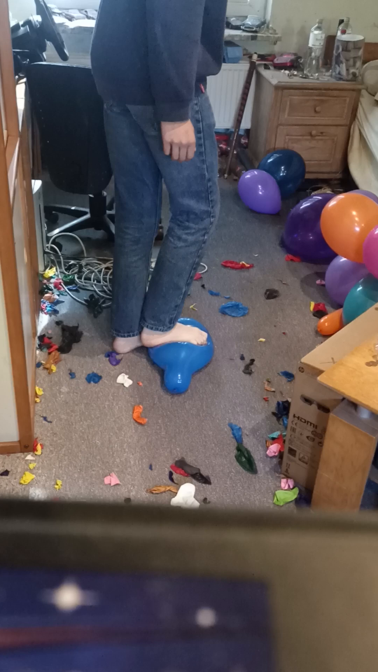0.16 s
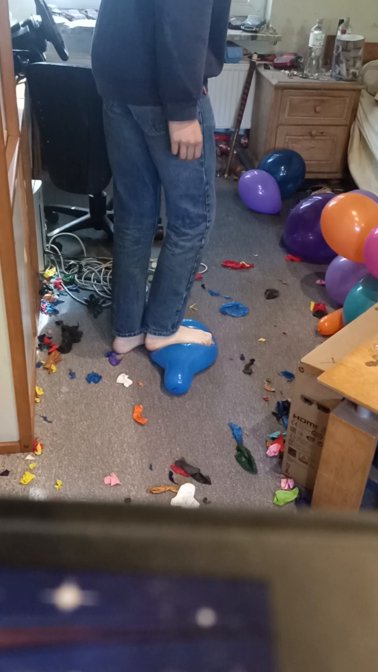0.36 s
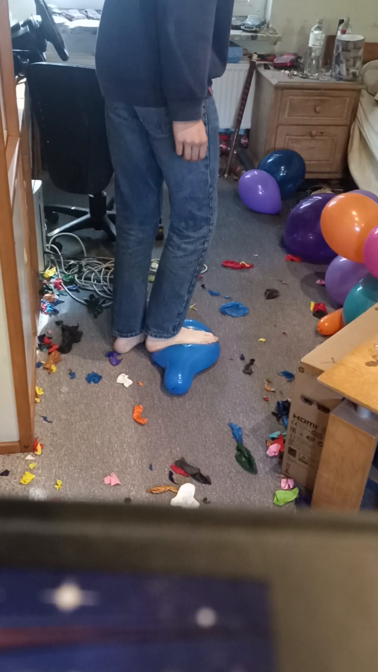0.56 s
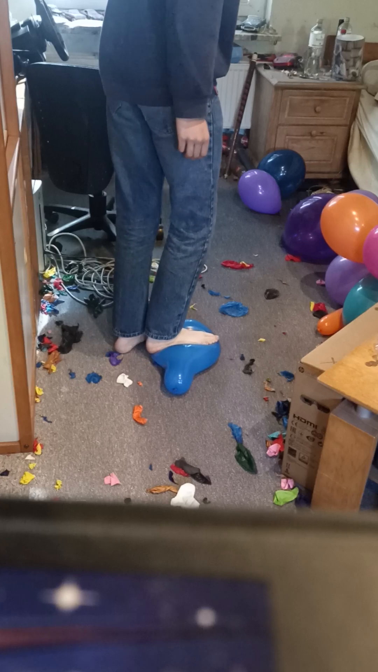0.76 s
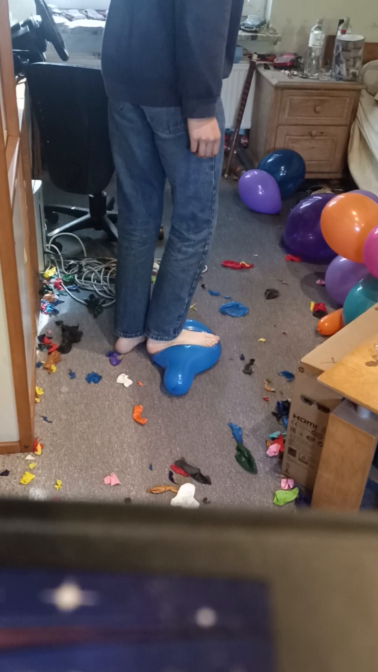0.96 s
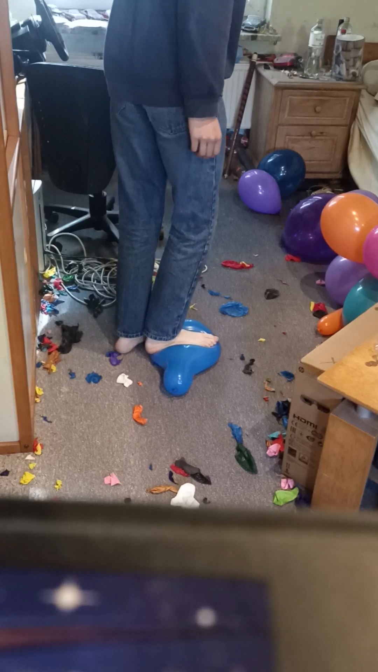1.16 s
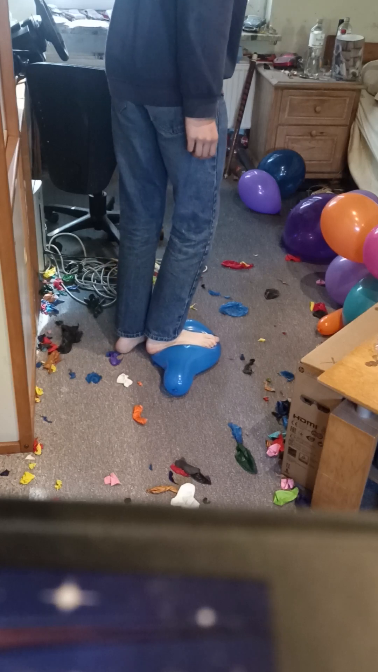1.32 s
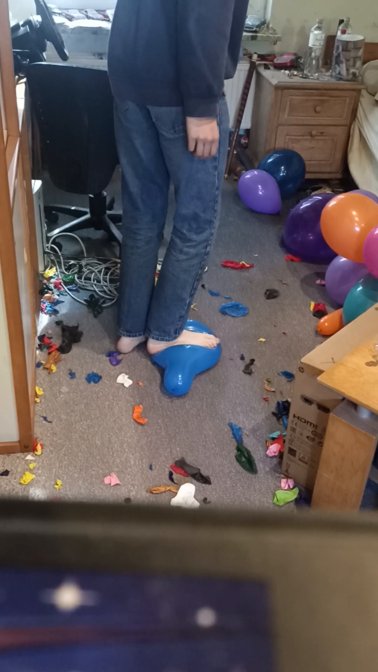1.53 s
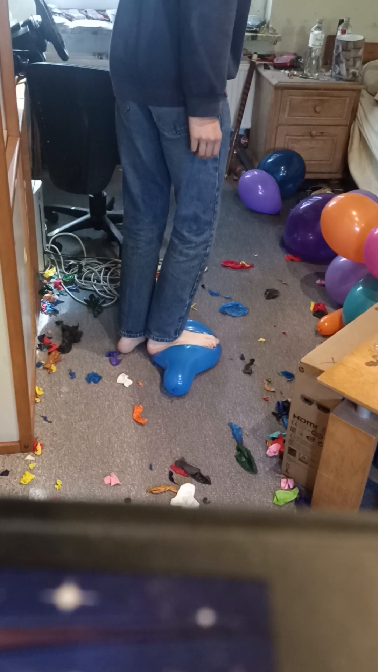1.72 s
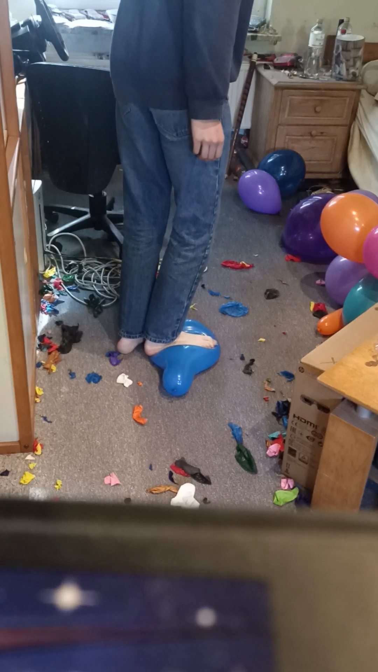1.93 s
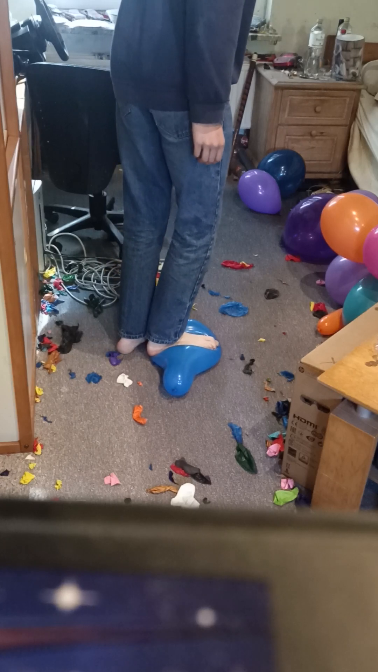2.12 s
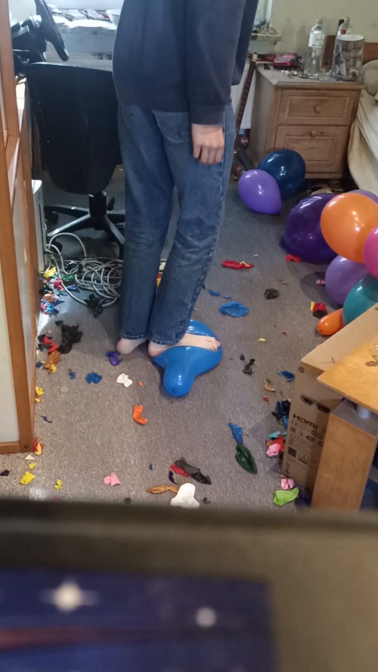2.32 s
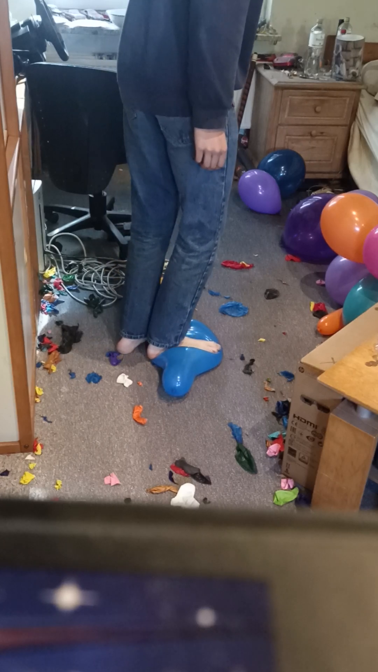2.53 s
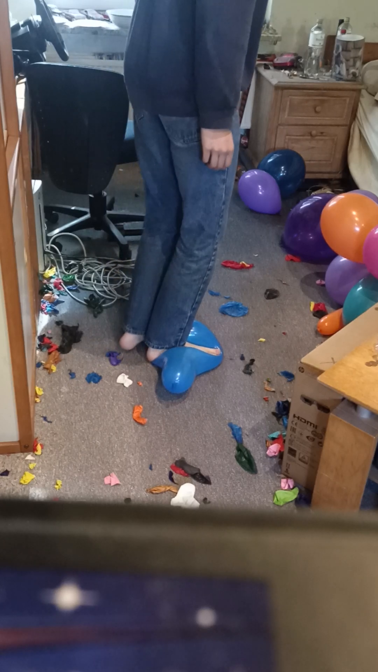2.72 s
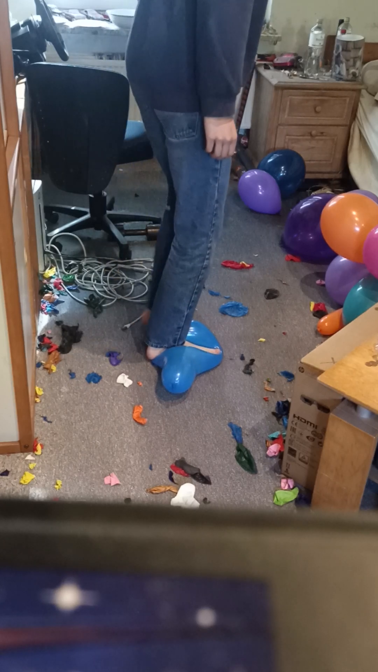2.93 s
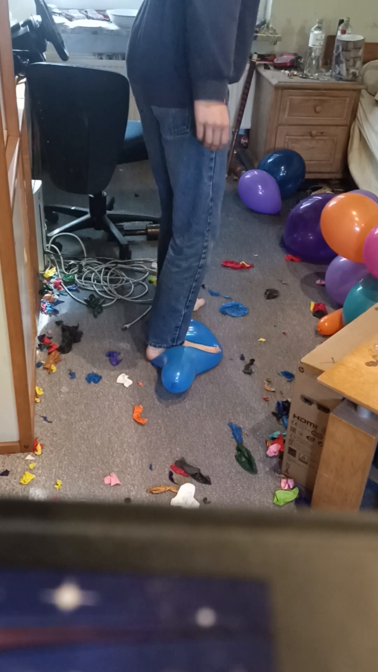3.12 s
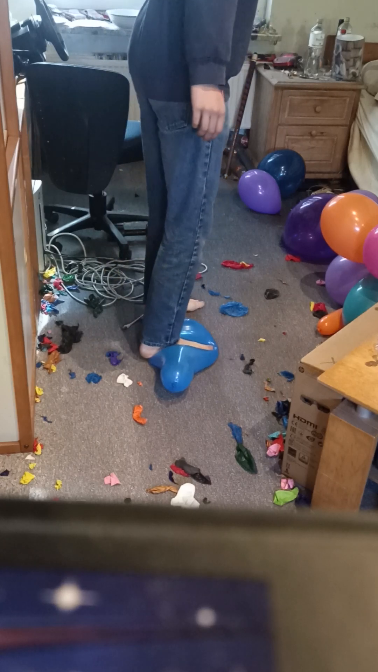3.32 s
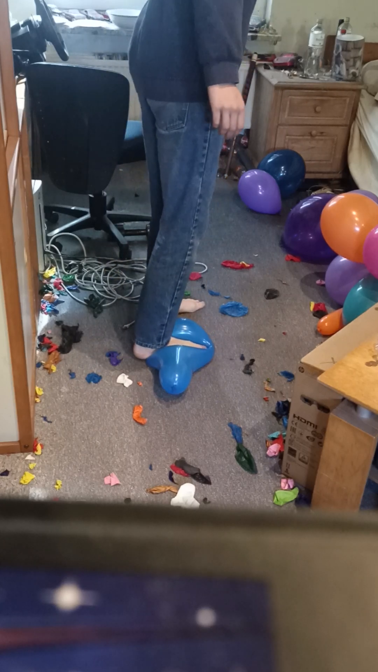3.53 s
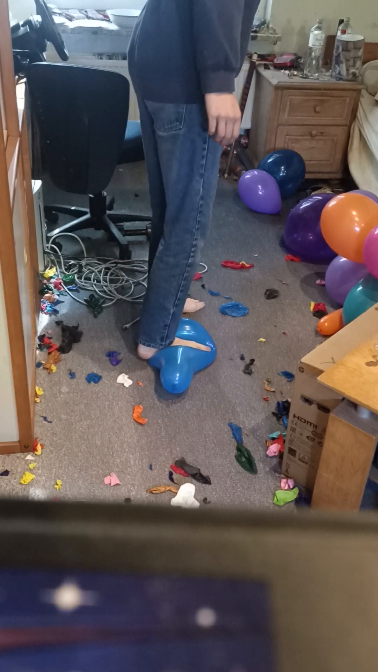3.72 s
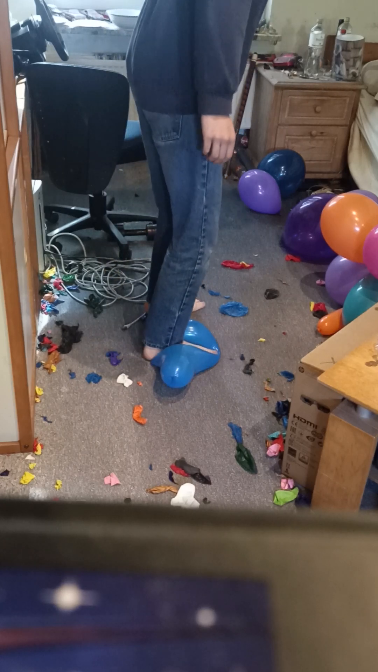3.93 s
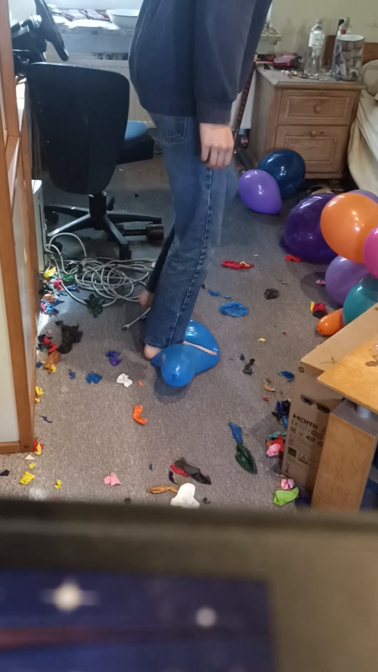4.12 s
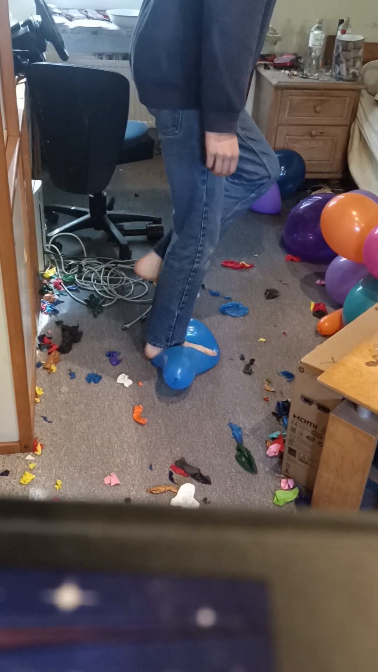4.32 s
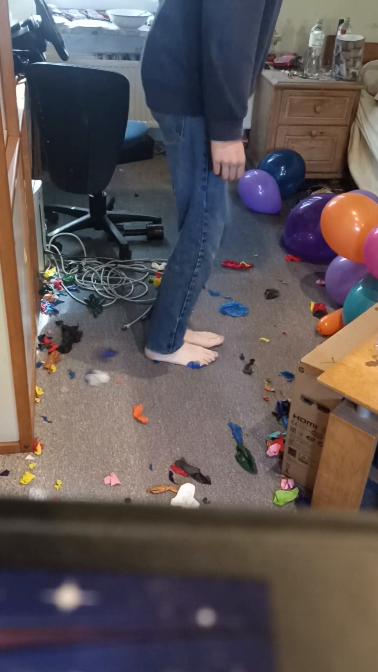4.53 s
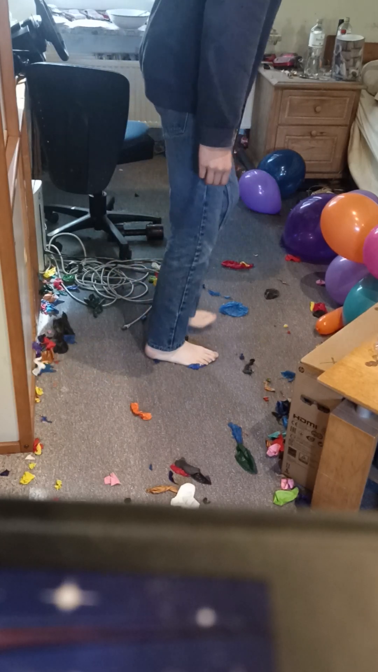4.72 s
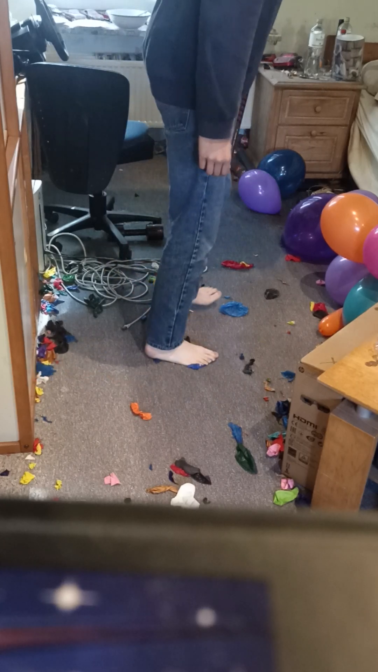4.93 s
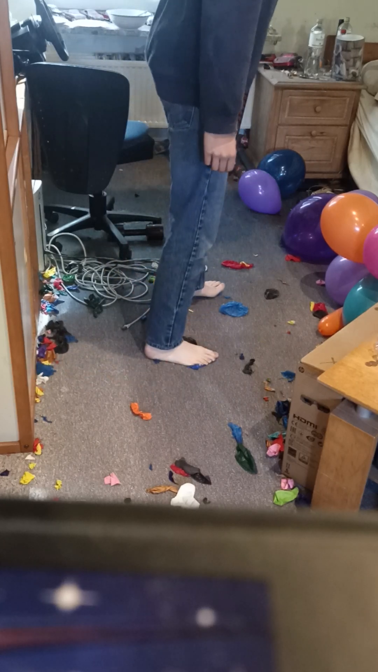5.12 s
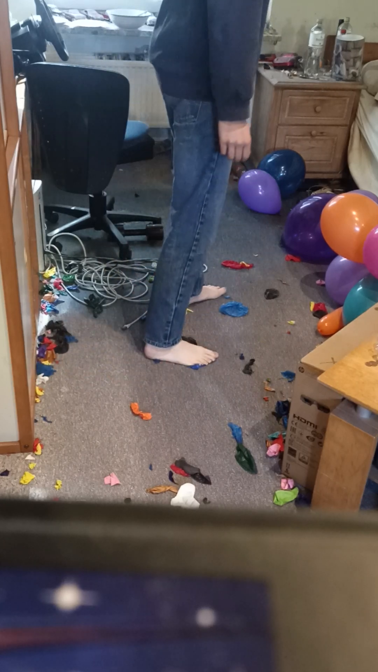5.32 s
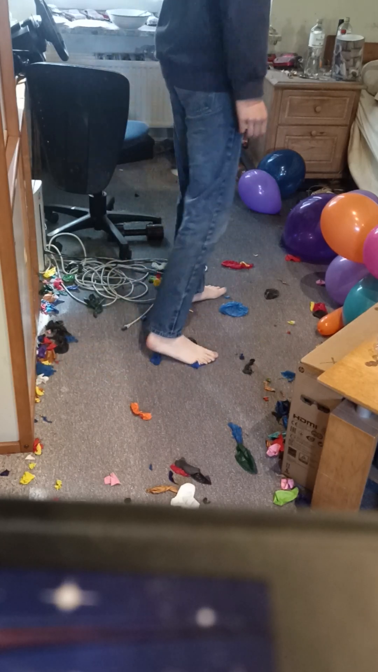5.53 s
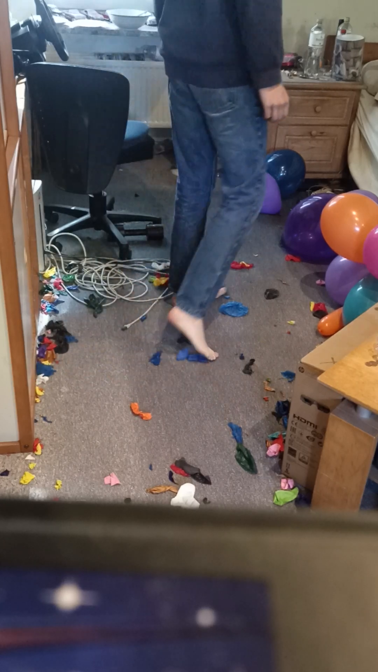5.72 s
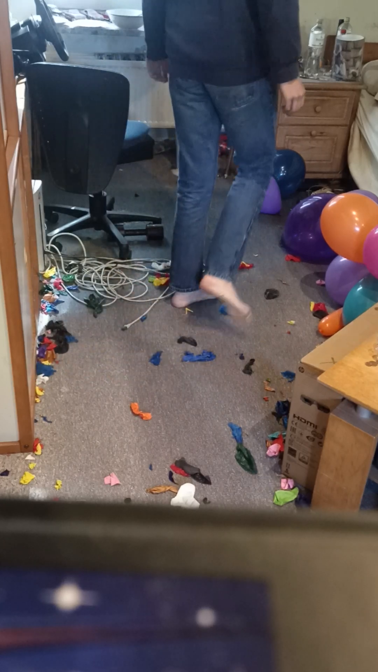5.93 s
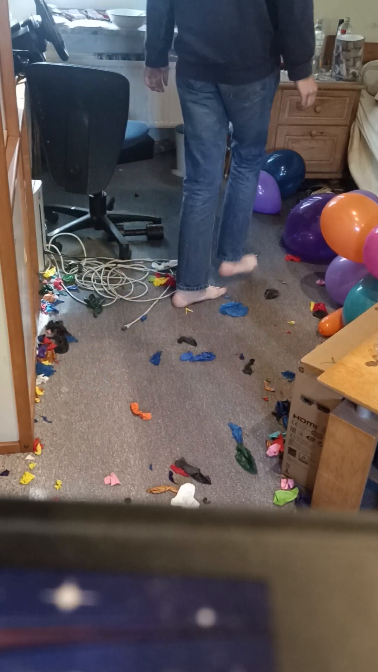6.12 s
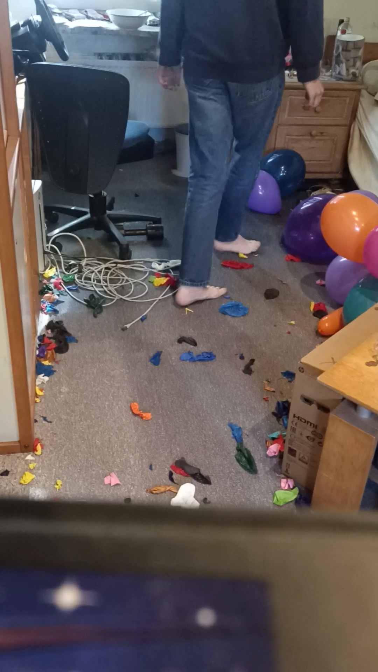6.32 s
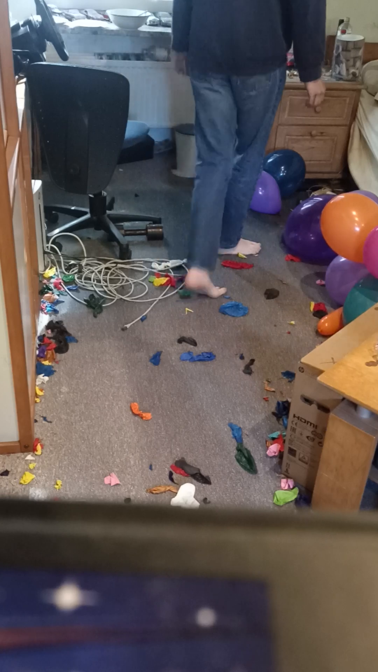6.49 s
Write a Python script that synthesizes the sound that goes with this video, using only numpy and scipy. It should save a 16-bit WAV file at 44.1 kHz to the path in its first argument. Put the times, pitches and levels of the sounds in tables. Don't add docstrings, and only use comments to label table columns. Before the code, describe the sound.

In a small carpeted room, latex snaps sharply underfoot and slips with a loud hollow crack almost at once. Quiet follows, with faint rubbing, scuffs and dull heel thumps over low room hum. Then a quick jump lands, squashes the balloon and it bursts in one massive overloaded bang, with a short reverberant tail and faint ringing objects. Soft barefoot steps move off. Close stereo microphone.

```python
import sys
import numpy as np
from scipy import signal
from scipy.fft import rfft, irfft, next_fast_len
from scipy.io import wavfile

SR = 44100
rng = np.random.default_rng(int(sys.argv[2]) if len(sys.argv) > 2 else 0)


def unload_audio(sound):
    columns = np.transpose(np.atleast_2d(sound))
    steps = np.round(np.clip(columns, -1, 1) * 32767)
    wavfile.write(sys.argv[1], SR, steps.astype(np.int16))


def field_ratio(decibels):
    return 10 ** (np.asarray(decibels, dtype=float) / 20)


N = 289207
TIME = np.arange(N) / SR
SIZE = next_fast_len(N + SR)
HZ = np.maximum(np.arange(SIZE // 2 + 1) * SR / SIZE, 1)
POP_S, BURST_S = 0.4350, 4.5764


def rms_one(x):
    return x / np.sqrt(np.mean(x ** 2) + 1e-20)


def at_hz(points, hz, column=1):
    points = np.array(points)
    return np.interp(np.log(hz), np.log(points[:, 0]), points[:, column])


def coloured(x, response):
    return irfft(rfft(x, SIZE) * response, SIZE)[..., :N]


def delay(ms):
    return np.exp(-2j * np.pi * np.arange(len(HZ)) / SIZE * np.round(ms * SR / 1000))


def drift(rate_hz):
    return rms_one(coloured(rng.standard_normal(N), 1 / (1 + (HZ / rate_hz) ** 2)))


def high_pass(x, order, hz):
    return signal.sosfilt(signal.butter(order, hz, "high", fs=SR, output="sos"), x)


def burst(step_db=21.5, length_ms=0.3006, push_db=-3.5, tear_db=10, tear_ms=7.9):
    ms = 1000 * (TIME - BURST_S)
    age = np.clip(ms, 0, None)
    wave = field_ratio(step_db) * (ms >= 0) * (1 - age / length_ms) * np.exp(-age / length_ms)
    rip = signal.lfilter([.3], [1, -.75], rng.standard_normal((2, N)))
    tear = field_ratio(tear_db) * (ms >= 0) * np.exp(-age / tear_ms) * rip
    push = -field_ratio(push_db) * np.exp(-((ms + 1.2) / 1.1) ** 2)
    return wave, push + tear


def impacts(events, sharpness_q, crack_db):
    direct, feed, click = np.zeros(N), np.zeros(N), np.zeros(2048)
    click[0] = 1
    crack = -high_pass(click, 2, 2800)
    for s, peak_db, hz, room_db in events:
        b, a = signal.iirpeak(hz, sharpness_q, fs=SR)
        body = signal.lfilter(b, a, signal.lfilter(b, a, click))
        body = body / np.abs(body).max()
        span = slice(round(s * SR), round(s * SR) + len(click))
        direct[span] += field_ratio(peak_db) * (body + field_ratio(crack_db - 2.5) * crack)
        feed[span] += field_ratio(peak_db + room_db + 4.5) * (body + field_ratio(crack_db + 8.5) * crack)
    return np.array([direct, feed])


def skin_snaps():
    # start in seconds, peak in dB, centre in Hz, room level in dB.
    cracks = [
        (0.0611, -43, 1510, -3),
        (0.066, -32, 1600, -8),
        (.2906, -31.5, 2649, 1.5),
        (0.2946, -27, 1794, -7),
        (0.4195, -30.5, 790, -0.5),
        (4.3701, -44.5, 1030, -6.5),
    ]
    # start in seconds, peak in dB, centre in Hz, room level in dB.
    pop = [
        (.4350, 2.5, 1807, -8.5),
    ]
    return impacts(cracks, 1.1, 1.8) + impacts(pop, 0.6, -6.5)


def sole_landings():
    # start in seconds, peak in dB, centre in Hz, room level in dB.
    landings = [
        (0.4348, -19, 428.1, -1.5),
        (3.927, -50, 450, -18.5),
        (4.5179, -17, 330, -3),
        (4.5215, -30, 1700, -2.5),
        (4.535, -21.5, 500, -6.5),
        (4.548, -17.5, 1100, -8),
        (4.559, -15, 1100, -3),
    ]
    return impacts(landings, 1.05, -29)


def carpet_scuffs():
    # start in seconds, peak in dB, centre in Hz, room level in dB.
    scuffs = [(2.591, -52.5, 1430, 3), (2.616, -44.5, 1600, 1), (3.062, -50.5, 2000, -8.5),
              (3.079, -51, 1200, 6.5), (3.487, -50, 1900, -6), (4.14, -48.5, 1646, 2),
              (5.122, -52, 392, -1.5), (5.637, -42, 2090, -1), (5.752, -39.5, 2480, -9),
              (5.841, -51, 2000, -8), (5.882, -57.5, 1998, -9), (6.345, -55.5, 2100, 9.5)]
    return impacts(scuffs, 1, -12)


def strokes(rows, rise_db_per_s, fall_db_per_s):
    out = np.zeros((3, N))
    for s, hold_s, db, bright_db, weight_db in rows:
        rise_db = rise_db_per_s * np.clip(s - TIME, 0, 1)
        fall_db = fall_db_per_s * np.clip(TIME - s - hold_s, 0, 1)
        out += field_ratio(-rise_db - fall_db) * field_ratio(db + np.c_[[0, bright_db, weight_db]])
    return out


def rubbing(grains_per_s=3000, spread_db=2.5, flicker_db=1.18):
    # start in seconds, hold in seconds, body in dB, brightness in dB, weight in dB.
    kneads = [(.35, 0.087, -57.5, -10.5, 0), (2.0, .03, -66.5, -9, 3.5), (2.56, 0.033, -62, -6, -6),
              (2.6, .05, -53.5, -5.5, 1.5), (2.7, 0.18, -68.5, -3, 4.5), (3.07, 0.027, -55, -12, -1.5),
              (3.12, .08, -69, -6, 8), (3.482, .02, -55.5, -9, -2.5), (3.93, 0.026, -62, -5.5, 3.5),
              (4.44, .065, -65, -7.5, 2.5), (5.09, 0.17, -64, -13, 5.5)]
    # start in seconds, hold in seconds, body in dB, brightness in dB, weight in dB.
    squash = [
        (4.521, .03, -38.5, -17, 10.5),
        (4.56, .01, -32.5, -13.5, 3),
    ]
    # start in seconds, hold in seconds, body in dB, brightness in dB.
    shuffles = [(2.917, 0.0093, -63.5, -14), (2.946, 0.067, -74, -6), (3.223, 0.163, -68.5, -6.5),
                (3.41, .06, -68.5, -4), (3.977, .03, -65, -3.5), (4.135, .04, -62.5, -8.5),
                (4.222, .12, -71, 1), (4.372, .012, -60, -5.5), (5.53, 0.0927, -62.5, -3),
                (5.631, 0.029, -60, -4), (5.699, 0.0405, -68.5, 3.5), (5.75, 0.03303, -57.5, -8),
                (5.84, .08, -66, 0.5), (6.354, 0.11, -64.5, -11.5)]
    # frequency in Hz, level in dB per Hz.
    body_colour = [(150, -16), (500, -17.5), (1000, -8.5), (1600, 0), (3000, -2), (5000, -16), (9000, -40)]
    hiss_colour = [(2500, -27), (4500, -4), (8000, -0.5), (11000, -3), (13500, -1), (16000, -0.5)]
    weight_colour = [(80, -24.5), (180, 4.5), (350, 1.5), (700, -6.5), (1300, -29)]

    born = rng.random((2, N)) < grains_per_s / SR
    size_db = spread_db * np.minimum(rng.exponential(1, (2, N)), 5)
    grains = born * field_ratio(size_db) * rng.choice([-1, 1], (2, N))
    grains = rms_one(grains) + 1.8 * rng.standard_normal((2, N))
    grains = grains * field_ratio(flicker_db * drift(40))
    body = rms_one(coloured(grains, field_ratio(at_hz(body_colour, HZ))))
    hiss = rms_one(coloured(grains, field_ratio(at_hz(hiss_colour, HZ))))
    weight = rms_one(coloured(grains[0], field_ratio(at_hz(weight_colour, HZ))))

    gains = strokes(kneads, 600, 220) + strokes(squash, 5600, 1100)
    gains = gains + strokes([(*row, -17.5) for row in shuffles], 600, 260)
    return field_ratio(-2) * gains[0] * body + field_ratio(7.5) * gains[1] * hiss + field_ratio(-5) * gains[2] * weight


def ticks(length_ms=1.6):
    # start in seconds, peak in dB.
    tick_events = [(0.0611, -38), (0.2913, -33.5), (2.5534, -61.5), (2.6161, -49), (3.9862, -51.5),
                   (4.3705, -43), (4.9643, -52.5), (5.1427, -52.5), (5.6366, -45), (5.6527, -47),
                   (5.8406, -43.5), (5.8815, -45.5), (6.1888, -53), (6.269, -62)]
    out, age_ms = np.zeros((2, N)), np.arange(512) / SR * 1000
    for s, peak_db in tick_events:
        spit = np.diff(rng.standard_normal((2, 513))) * np.exp(-age_ms / length_ms)
        at = round(s * SR)
        out[:, at:at + 512] += field_ratio(peak_db - 0.5) * spit
    return out


def thumps():
    # start in seconds, peak in dB, frequency in Hz, t60 in seconds.
    heel_thumps = [
        (0.028, -44.5, 250, 0.174),
        (0.591, -41, 215, 0.33),
        (2.603, -38, 191.1, 0.203),
        (3.088, -30.5, 136, 0.083),
        (3.93, -56, 201.3, 0.091),
        (4.4, -69, 100, .15),
        (5.04, -47, 100, 0.3),
        (5.121, -47, 146.9, 0.23),
        (5.2, -42, 95.99, 0.17),
    ]
    out = np.zeros(N)
    for s, peak_db, hz, t60 in heel_thumps:
        age = np.clip(TIME - s, 0, None)
        out += field_ratio(peak_db - 60 * age / t60) * (1 - np.exp(-age / 0.0085)) * np.sin(2 * np.pi * hz * age)
    return out


def ringing(s, modes, level_db, blur=0.057):
    age, out, at = np.arange(SR) / SR, np.zeros((2, N)), round(s * SR)
    for hz, db, t60 in modes:
        wander = blur * np.cumsum(rng.standard_normal(SR)) + 2 * rng.random((2, 1))
        out[:, at:at + SR] += field_ratio(db - 60 * age / t60) * np.sin(2 * np.pi * hz * age + wander)
    out[:, at:at + SR] *= field_ratio(level_db) * (1 - np.exp(-age / 0.0055))
    return out


def balloon_air_ring():
    # frequency in Hz, level in dB, t60 in seconds.
    air_modes = [(339.6, -7.5, .3), (554, -11.5, 0.38), (680.8, -2.5, 0.25), (877.7, -2, 0.28),
                 (1082.7, -6.5, 0.3), (1248.4, -4, 0.29), (1423, -6, .25), (1543, 0, 0.29),
                 (1846, -3, 0.096)]
    return ringing(POP_S, air_modes, -20.5)


def loose_things_ring():
    # frequency in Hz, level in dB, t60 in seconds.
    shelf_modes = [(1270, -18, 0.78), (1510, -12, 0.45), (1600, -2.5, 0.59), (1900, -9.5, 0.34),
                   (2424, -10.5, 0.64), (2480, -9.5, 0.69)]
    return ringing(BURST_S, shelf_modes, -11)


def stereo_pair(mid, side, alike):
    return np.sqrt(1 + alike) * mid + np.sqrt(1 - alike) * side * [[1], [-1]]


def early_echoes():
    # delay in ms, left level in dB, right level in dB.
    reflections = [
        (4.2, -6, -5.5),
        (9.8, -7.5, -8.5),
        (16.5, -4, -10),
    ]
    return 1 + sum(field_ratio(np.c_[db]) * delay(ms) for ms, *db in reflections)


def room_response(build_ms=9.7):
    # frequency in Hz, t60 in seconds.
    room_t60 = [(60, 0.35), (150, 0.37), (300, 0.31), (700, 0.2938), (1200, 0.289), (2000, 0.3036),
                (4800, 0.3172), (9000, 0.27), (15000, 0.27)]
    # frequency in Hz, left-right likeness from 0 to 1.
    room_likeness = [(100, 1), (500, 1), (1000, 0.8), (2500, 0)]
    t, band_hz = np.arange(SR) / SR, 40 * 2 ** np.arange(0, 9.1, .5)
    white, tail = rng.standard_normal((2, 2, SR)), 0
    for k, (low, high) in enumerate(zip(band_hz, band_hz[1:])):
        band = signal.butter(2, [low, high], "band", fs=SR, output="sos")
        mid, side = signal.sosfilt(band, white[k % 2])
        hz = np.sqrt(low * high)
        pair = stereo_pair(mid, side, np.clip(at_hz(room_likeness, hz), 0, 1))
        fall_db = -60 * t / at_hz(room_t60, hz)
        passage = field_ratio(-32 + 0.55 * fall_db)
        tail = tail + pair * (field_ratio(fall_db) + passage)
    tail = tail * (1 - np.exp(-(1000 * t / build_ms) ** 2))
    return rfft(tail / np.sqrt(np.sum(tail ** 2) / 2), SIZE)


def ports(right_lag_ms=.35):
    # frequency in Hz, left level in dB, right level in dB.
    port_colour = [(30, -9.5, -11), (100, -11.5, -10), (250, -1, -4), (725, 0.5, 5), (1389, -6, 8.5),
                   (2397.7, -5, -1.5), (3326, -4, -5), (4130, -8, -15), (6370, -6.5, -11),
                   (7760, -14.5, -22.5), (11290, -4.5, -15.5), (11956, 5.5, -14.5), (12970, -2, -17.5),
                   (16000, -3.5, -23.5)]
    log_gain = np.log(field_ratio([at_hz(port_colour, HZ, column=1), at_hz(port_colour, HZ, column=2)]))
    cepstrum = irfft(log_gain, SIZE)
    cepstrum[:, 1:SIZE // 2] *= 2
    cepstrum[:, SIZE // 2 + 1:] = 0
    return np.exp(rfft(cepstrum)) * [delay(0), delay(right_lag_ms)]


def room_air():
    # frequency in Hz, level in dB per Hz.
    air_colour = [(18, -41), (30, -17.5), (43, -6), (148, -3), (333, -8), (770, -14), (949, -14),
                  (3080, -22), (3800, -29), (6580, -32), (7300, -42), (12300, -28.5), (15600, -33.5)]
    # frequency in Hz, left-right balance in dB.
    air_balance = [(60, 5.5), (110, 3), (200, 0.5), (380, 1), (700, 0), (1290, -6), (2380, -1.5), (4400, 0),
                   (8120, 3), (15000, 7.5)]
    # frequency in Hz, left-right likeness.
    air_likeness = [(60, 0.27), (130, 0.049), (290, 0.15), (640, -0.27), (1410, -0.22), (3100, -0.54),
                    (6820, -0.01), (15000, -0.01)]
    mid, side = rfft(rng.standard_normal((2, N)), SIZE)
    pair = stereo_pair(mid, side, np.clip(at_hz(air_likeness, HZ), 0, 1) ** .5)
    lean = field_ratio(at_hz(air_balance, HZ) / 2 * [[1], [-1]])
    air = irfft(pair * lean * field_ratio(at_hz(air_colour, HZ)), SIZE)[:, :N]
    return field_ratio(-64 + 0.2 * drift(1.7)) * rms_one(air)


def traffic_drone():
    # line frequency in Hz, width in Hz.
    drone_lines = [(73, 1.5), (148, 21), (330, 5)]
    # nearest time in seconds, seconds to fall 6 dB, level in dB.
    line_swells = [
        [(1.3, 0.56, -73), (2.25, 0.33, -62), (3.05, 0.39, -72.5)],
        [(1.55, 0.59, -65), (2.64, 0.0044, -46.5), (3.1, -0.0473, -55.5)],
        [(1.1, 2.09, -70), (1.6, -0.34, -87.5), (2.5, -0.18, -70)],
    ]
    out = 0
    for (hz, width_hz), swells in zip(drone_lines, line_swells):
        line = coloured(rng.standard_normal(N), 1 / (1 + (2 * (HZ - hz) / width_hz) ** 2))
        swell = sum(field_ratio(db - 6 * ((TIME - s) / fall_s) ** 2) for s, fall_s, db in swells)
        out = out + field_ratio(-3.5) * swell * rms_one(line)
    return out


def background():
    return high_pass(room_air() + traffic_drone(), 4, 68)


def scene():
    direct, feed = skin_snaps() + sole_landings() + carpet_scuffs()
    wave, near = burst()
    lean = field_ratio(1.5 * np.c_[[1, -1]])
    early = coloured(direct * lean + wave, early_echoes())
    tail = coloured(feed + field_ratio(21.5) * wave, room_response())
    rings = balloon_air_ring() + loose_things_ring()
    arriving = early + near + tail + rings + thumps() + ticks() + rubbing()
    return coloured(arriving, ports()) + background()


def roll_off(x):
    return signal.sosfilt(signal.butter(12, 15750, fs=SR, output="sos"), x)


def record(dry):
    full_scale = .92
    turns = BURST_S + .004 + np.cumsum([0, 0.17, 0.12, 0.23])
    gain_db = np.interp(TIME, turns, [-8, -10, 0, 0], left=0)
    level = field_ratio(gain_db) * dry / full_scale
    return roll_off(full_scale * level / (0.5 + level ** 4) ** .25)


dry = scene()
out = record(dry)
unload_audio(out)
```